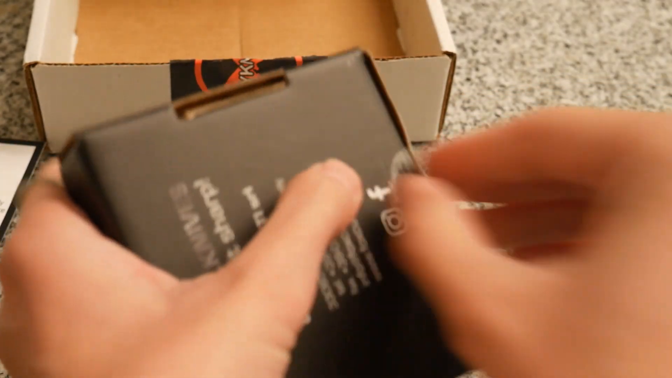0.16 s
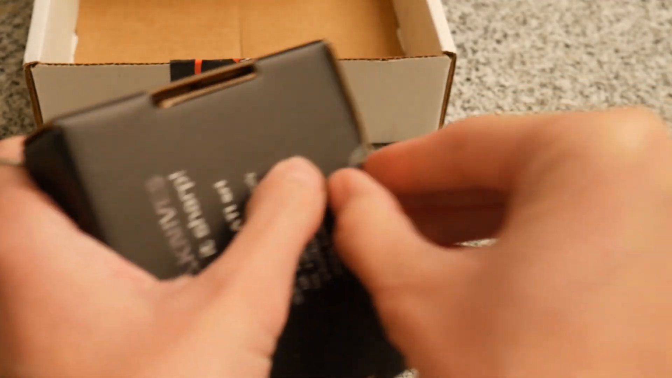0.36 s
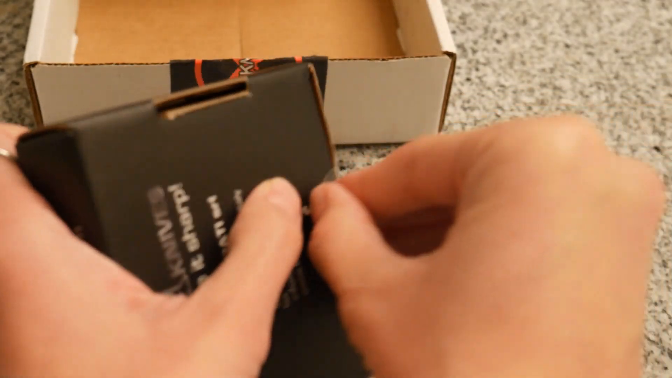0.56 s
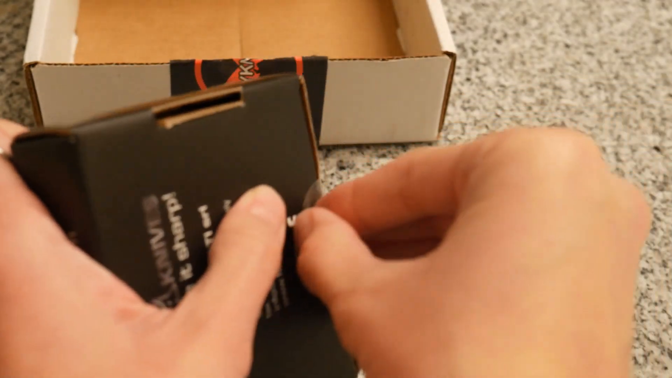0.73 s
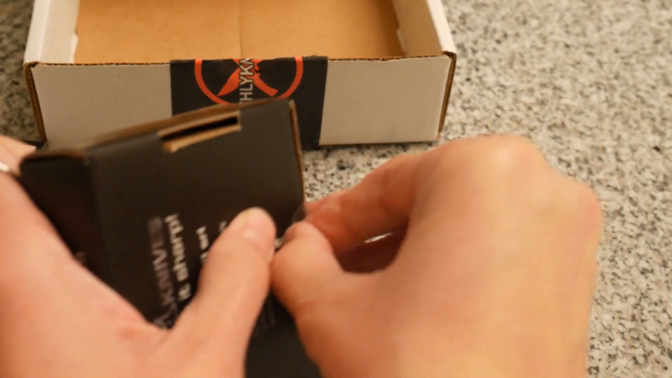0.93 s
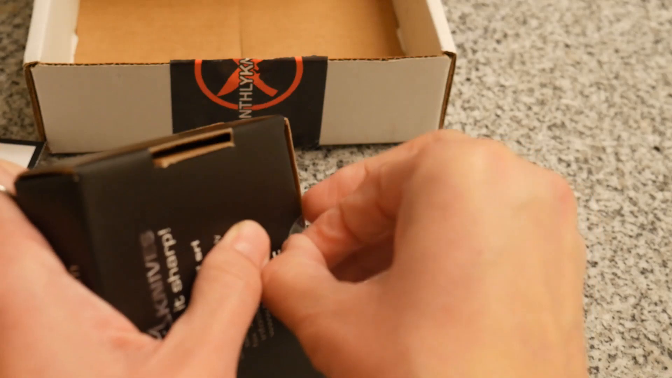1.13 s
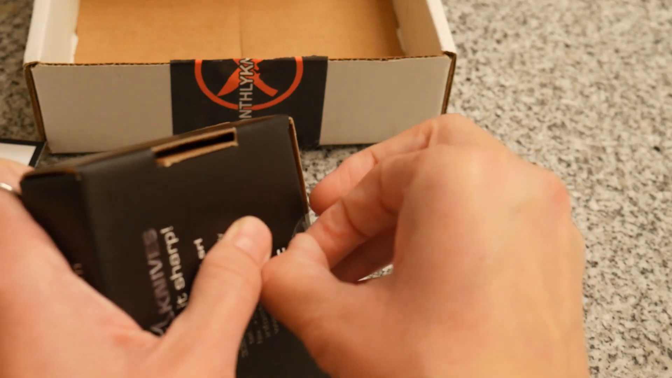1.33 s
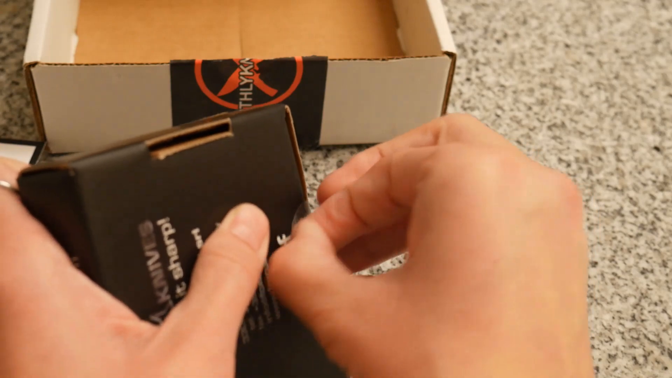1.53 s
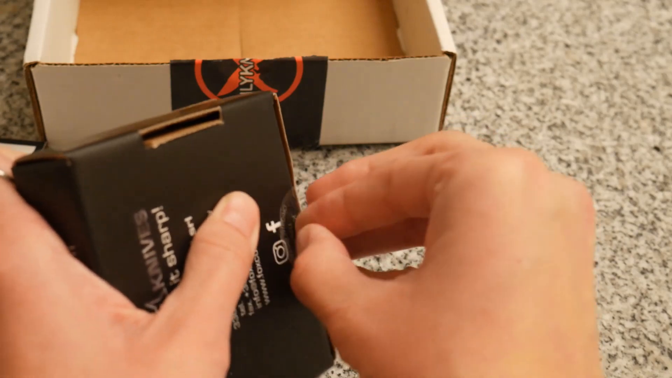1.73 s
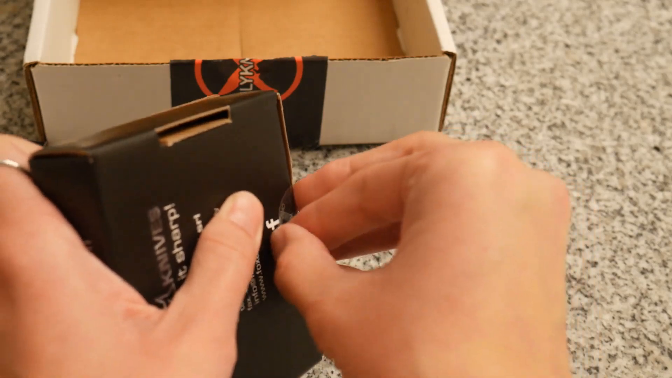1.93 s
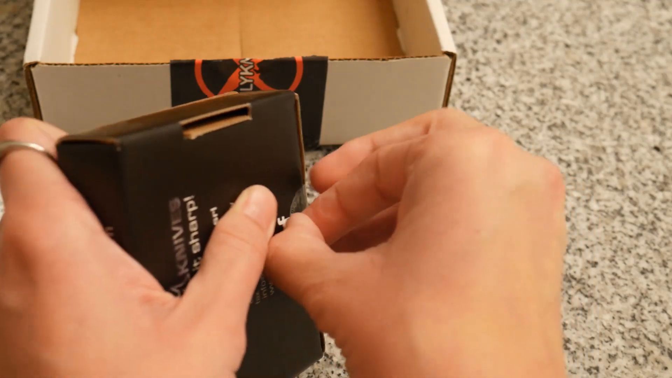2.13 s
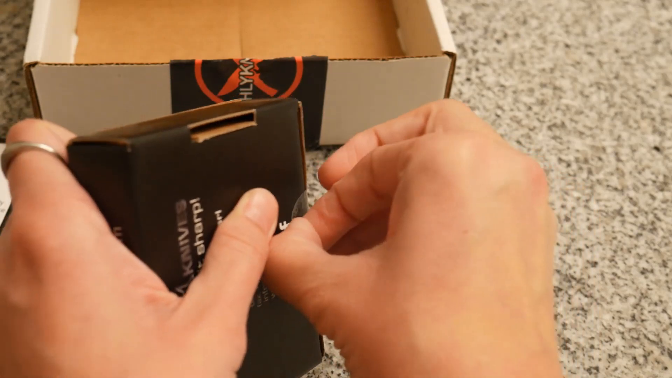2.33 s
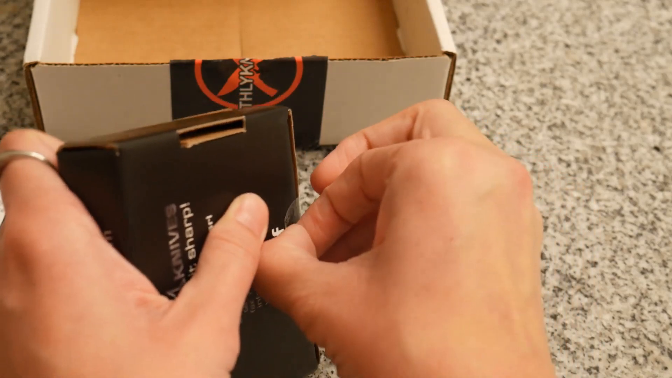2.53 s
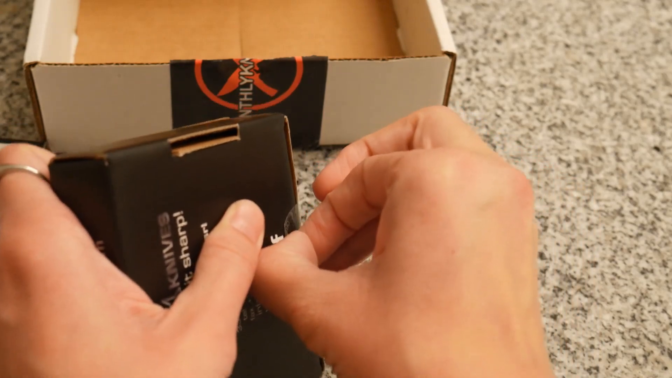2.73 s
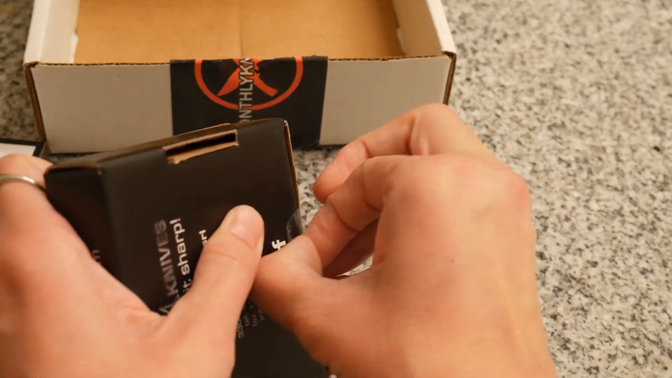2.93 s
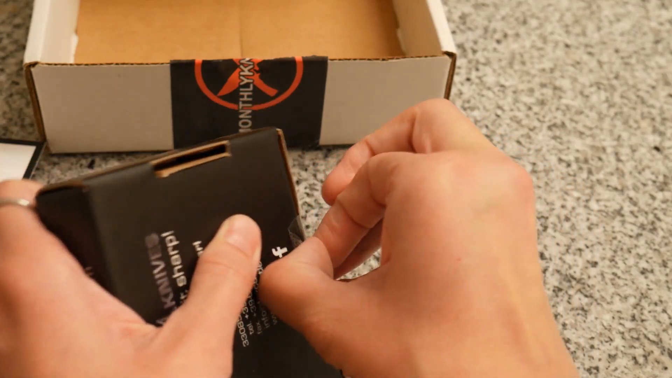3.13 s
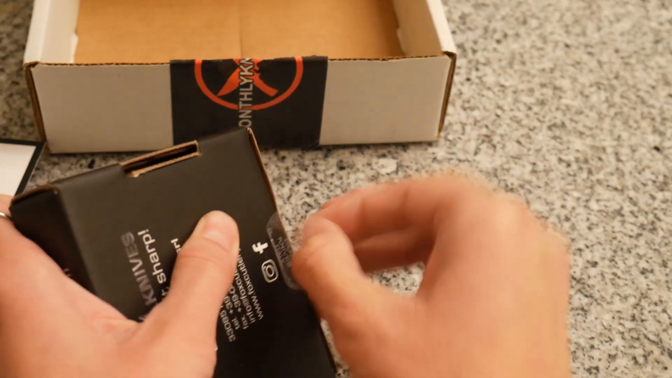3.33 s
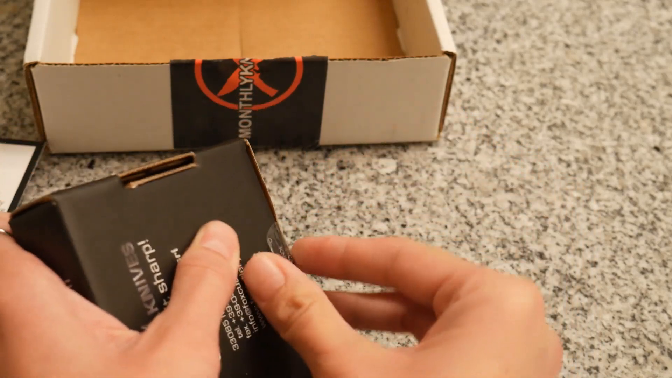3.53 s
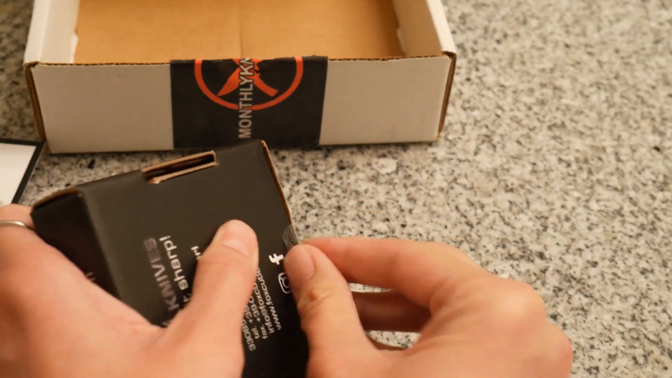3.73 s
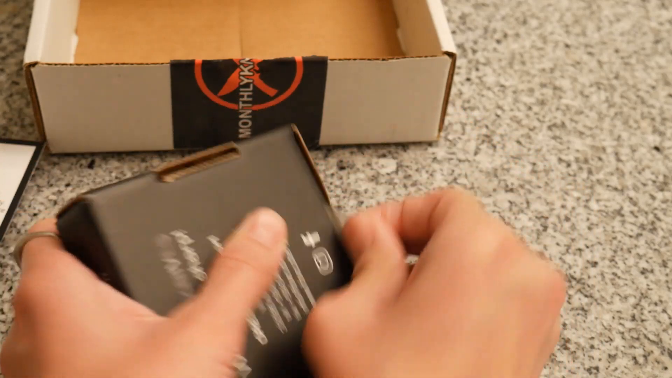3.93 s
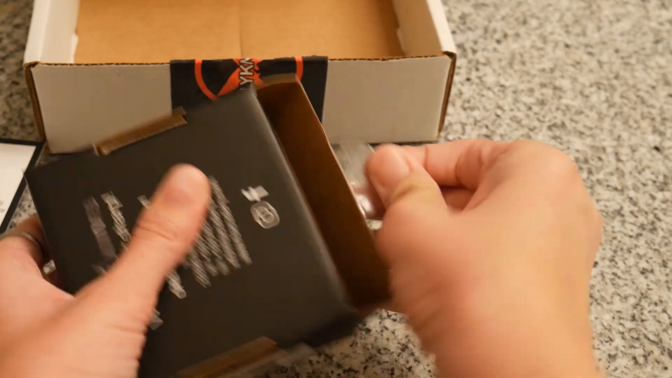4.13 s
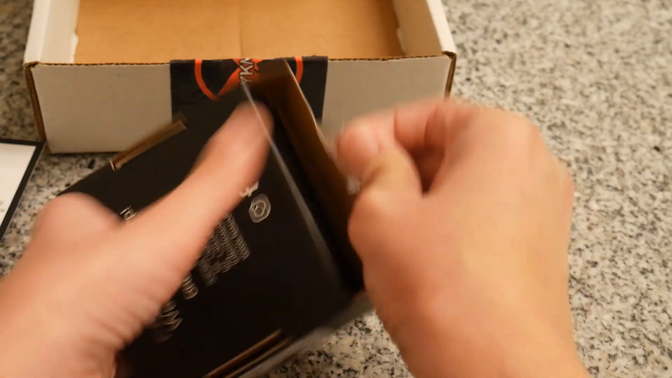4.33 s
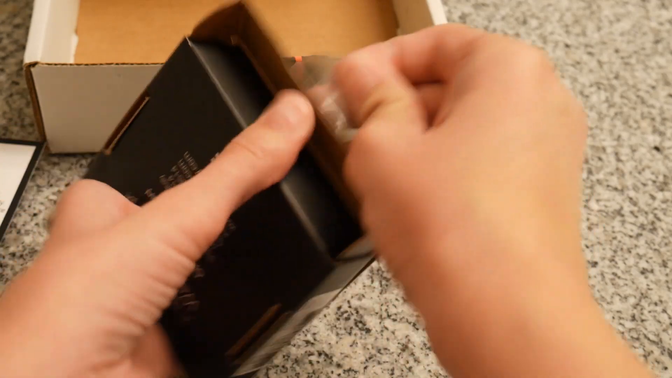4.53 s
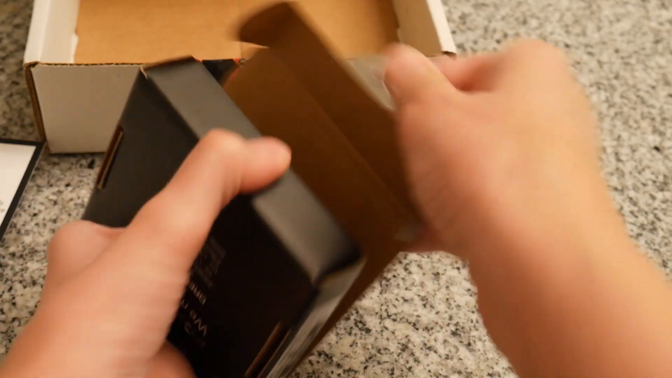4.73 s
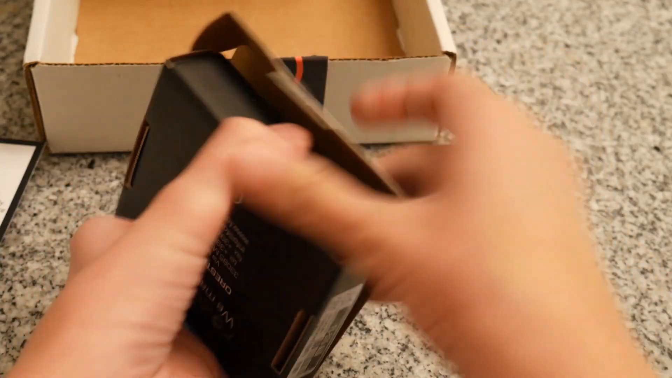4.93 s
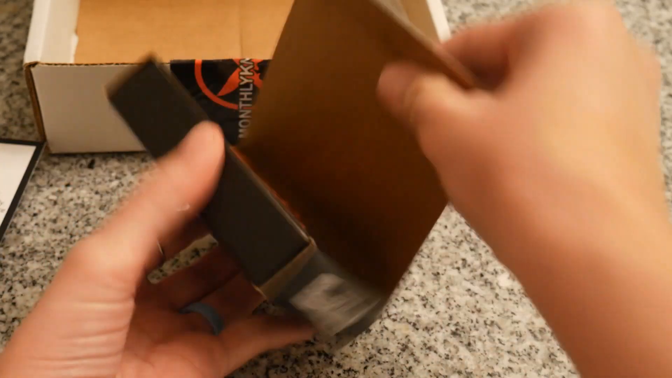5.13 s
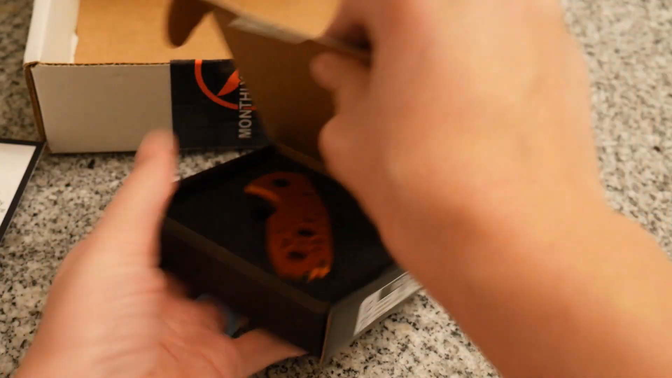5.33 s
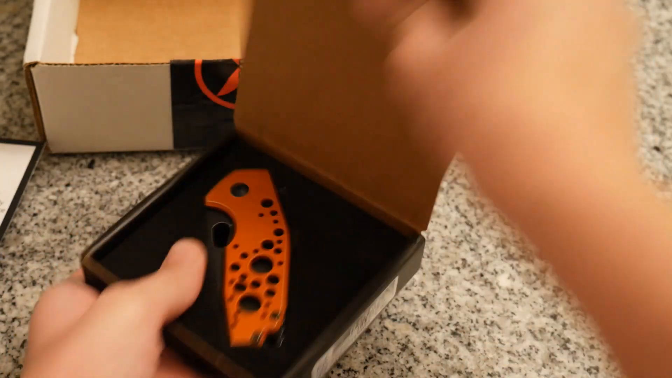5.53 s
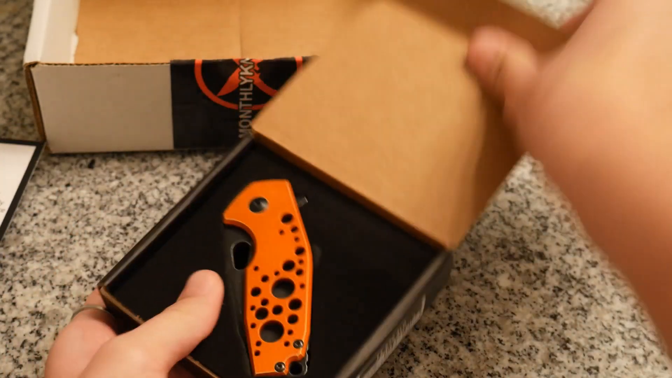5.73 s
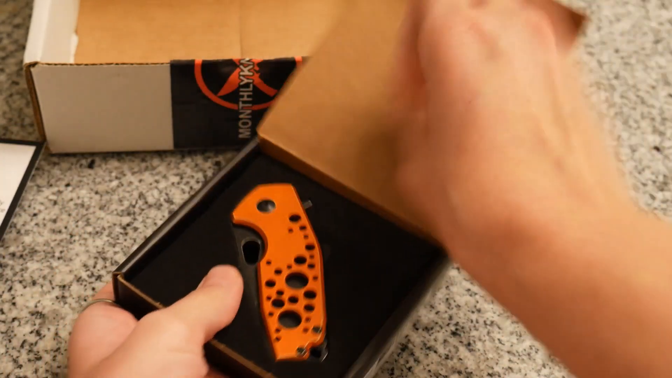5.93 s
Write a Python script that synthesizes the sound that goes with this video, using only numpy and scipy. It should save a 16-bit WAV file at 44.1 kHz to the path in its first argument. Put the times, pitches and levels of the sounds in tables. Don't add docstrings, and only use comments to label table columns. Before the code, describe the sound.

Close, dry unboxing: soft rubs and tiny nail clicks, near silence, then bright peeling snaps, hollow card knocks and rasping drags.

```python
import sys
import numpy as np
from scipy import signal
from scipy.fft import rfft, irfft
from scipy.io import wavfile

SR = 44100
rng = np.random.default_rng(int(sys.argv[2]) if len(sys.argv) > 2 else 0)


def undo_db(level):
    steps = np.asarray(level, float) / 20
    return 10 ** steps


def master(y):
    cut = np.clip(np.atleast_2d(y).T, -1, 1)
    pcm = np.round(cut * 32767)
    wavfile.write(sys.argv[1], SR, pcm.astype(np.int16))


N = 267564

# (shut until [s], open from [s])
LID_OPENS = (3.97, 4.304)
# (time [s], peak [dB], pitch [Hz], brightness [dB])
PICKS = [(0.145, -52, 5040, -18), (0.7182, -56, 2930, -37), (0.826, -54, 2500, -30),
         (0.846, -60, 2900, -20), (1.5065, -34, 7500, -8.5), (1.5268, -24, 7500, -4.5),
         (1.5479, -17, 3400, -17), (1.6932, -53, 3020, -32), (1.7943, -42, 3117, -39),
         (1.8065, -40.5, 2800, -34), (2.0008, -30.5, 6050, -11.5), (2.0496, -53, 2910, -29),
         (2.2042, -56, 3830, -6.5), (2.2107, -44.5, 6470, 2), (3.202, -46, 3425, -38),
         (3.2035, -18, 4460, -31), (3.482, -43, 3950, -11.5)]
# (time [s], peak [dB], pitch [Hz], brightness [dB])
PEELS = [(3.9326, -34.5, 4230, 3), (3.941, -14, 3900, -6), (3.9968, -2, 4400, -10),
         (4.2106, -21.5, 4220, -34), (4.231, -9.5, 3600, -10), (4.352, -15.5, 5770, -8),
         (4.3764, -16, 5330, -7), (4.3853, -9.5, 6530, -24), (4.427, -25.5, 7300, -15),
         (4.483, -38, 3180, -20), (4.5297, -38, 4970, -27), (4.6526, -33.5, 4770, -19.5),
         (4.688, -5, 5300, -13.5), (4.697, -17.5, 4870, 12), (4.7314, -21.5, 5000, -13),
         (4.743, -21, 2840, -34), (4.84, -37, 4530, -14), (4.9645, -29, 2950, -8),
         (5.1808, -30.5, 2630, -32), (5.7484, -45, 4630, -3), (5.7607, -37, 3900, -18),
         (5.8894, -19.5, 2850, -15)]


def rms_one(x):
    return x / np.sqrt(np.mean(x ** 2) + 1e-20)


def at_hz(points, hz):
    curve_hz, value = np.array(points).T[:2]
    return np.interp(np.log(hz), np.log(curve_hz), value)


def coloured(white, spectrum):
    hz = np.maximum(np.fft.rfftfreq(len(white), 1 / SR), 1)
    return rms_one(irfft(rfft(white) * undo_db(at_hz(spectrum, hz)), len(white)))


def ring(clicks, hz, t60):
    r = undo_db(-60 / (t60 * SR))
    w = 2 * np.pi * hz / SR
    return signal.lfilter([0, np.sin(w)], [1, -2 * r * np.cos(w), r * r], clicks + 1e-18)


def flicker(rate_hz, depth_db):
    step = 16
    r = np.exp(-2 * np.pi * step * rate_hz / SR)
    slow = rms_one(signal.lfilter([1], [1, -2 * r, r * r], rng.standard_normal(N // step + 1)))
    return np.repeat(undo_db(depth_db * slow), step)[:N]


def grit(per_s, spread_db):
    out = np.zeros(N)
    slips = rng.random(N) < per_s / SR
    size = rng.laplace(0, 1, slips.sum())
    out[slips] = np.sign(size) * undo_db(spread_db * np.minimum(np.abs(size), 4))
    return rms_one(out)


def strokes(rows, loss_db=0):
    peak, level_db, rise, fall = np.transpose(rows)[:4, :, None]
    step = 32
    late = np.arange(0, N + step, step) / SR - peak
    away = np.maximum(late / np.clip(fall, .004, .7), -late / np.clip(rise, .004, .7))
    swell_db = level_db - loss_db - 20 * away ** 1.205
    total_db = 10 * np.log10(np.sum(undo_db(2 * swell_db), axis=0) + 1e-14)
    return np.interp(np.arange(N) / step, np.arange(len(total_db)), total_db) - 4.5


def room_tone():
    # (frequency [Hz], density [dB per Hz])
    air_mid = [(12, -27), (20, -15), (91, -9.5), (108, -6.5), (250, -2.5), (414, -9.5), (477, -11.5),
               (564, -11), (1890, -15.5), (2290, -14.5), (2790, -15.5), (12500, -24), (15000, -25),
               (15400, -25), (15700, -50)]
    # (frequency [Hz], density [dB per Hz])
    air_side = [(12, -54), (20, -8), (200, 7), (243, 7), (313, 7), (438, 4.5), (504, 4.5), (580, 4),
                (5960, -18.5), (14600, -21.5), (15400, -25), (15700, -50)]
    mid = undo_db(-67.5) * coloured(rng.standard_normal(N), air_mid)
    hum = ring(rng.standard_normal(N), hz=120, t60=0.66)
    mid += undo_db(-78.5) * rms_one(hum)
    side = undo_db(-61.5) * coloured(rng.standard_normal(N), air_side)
    return np.array([mid + side, mid - side])


def room():
    # (frequency [Hz], t60 [s])
    room_t60 = [(150, 0.25), (530, 0.36), (1400, 0.22), (3700, 0.23), (9700, 0.26), (16000, 0.12)]
    # (delay [s], level [dB])
    echoes = [
        (.0030, -14.5),
        (.0094, -14),
        (.0118, -23),
        (.0160, -23.5),
        (.0200, -17.5),
        (.0290, -23),
    ]
    tail_db, tail_side_db = -30.5, -5.5
    size = int(.5 * SR)
    age = np.arange(size) / SR
    white = rng.standard_normal((2, 2, size))
    tail = 0
    edges = 80 * 2. ** np.arange(9)
    for k, (low, high) in enumerate(zip(edges, np.minimum(edges[1:], 20000))):
        octave = signal.butter(2, [low, high], "band", fs=SR, output="sos")
        band = signal.sosfilt(octave, white[k % 2])
        tail = tail + band * undo_db(-60 * age / at_hz(room_t60, np.sqrt(low * high)))
    mid, side = tail * undo_db(tail_db) * (1 - np.exp(-age / 0.0027))
    for k, (lag, level_db) in enumerate(echoes):
        mid[int(lag * SR)] += undo_db(level_db)
        side[int(lag * SR) + 3] += undo_db(level_db) * (-1) ** k
    side = signal.lfilter(*signal.butter(1, 400, "high", fs=SR), side)
    side = undo_db(tail_side_db) * side
    return np.array([mid + side, mid - side])


def rub_db(place):
    # (peak time [s], level [dB], rise [s], 20 dB fall [s], place [1 face, 2 edge, 3 skin alone])
    slides = [(0.0, -52.5, 0.026, 0.041, 1.4), (0.052, -54, 0.18, 0.051, 1.82),
              (0.148, -51.5, 0.015, .09, 1.9), (0.31, -60.5, 0.12, 0.03, 2),
              (0.432, -42, 0.052, 0.094, 1.34), (0.49, -43.5, 0.11, 0.027, 1.57),
              (0.606, -59.5, 0.27, 0.06, 1.84), (0.674, -54.5, 0.035, 0.026, 1.34),
              (0.76, -53.5, 0.11, 0.032, 1.8), (0.84, -50.5, 0.095, 0.19, 1.58),
              (1.0, -59.5, 0.17, 0.53, 1.75), (1.164, -50, 0.031, 0.014, 1.94),
              (1.49, -58, 0.062, 0.64, 0.76), (1.66, -66, 0.29, 0.066, 2), (1.93, -46.5, 0.065, 0.17, 1.46),
              (2.03, -50.5, .12, 0.091, 1.87), (2.9, -59, 0.079, 0.23, 1.65), (3.0, -53, 0.16, 0.12, 2),
              (3.35, -52.5, 0.083, 0.018, 2.04), (3.475, -53.5, 0.14, 0.15, 0.61),
              (3.63, -46.5, 0.11, 0.053, 2), (3.67, -53, 0.019, 0.06, 0.92),
              (3.825, -42, 0.03, 0.099, 2.17), (3.885, -42, 0.053, 0.051, 2.06)]
    # (peak time [s], level [dB], rise [s], 20 dB fall [s], place [1 face, 2 edge, 3 skin alone])
    drags = [(4.12, -37, 1, 0.081, 1.52), (4.172, -43.5, 0.19, 0.083, 3.66), (4.46, -43.5, 0.22, 0.14, 1.4),
             (4.495, -32.5, 0.022, 0.025, 2.6), (4.66, -48, 0.14, 0.14, 1.7),
             (4.72, -33, 0.086, 0.035, 3.4), (4.742, -25, 0.027, 0.055, 2.03), (4.87, -41, 0.07, 0.2, 2),
             (4.95, -42.5, 0.074, 0.09, 2.9), (5.05, -42.5, 0.22, 0.21, 2.9),
             (5.06, -50.5, 0.044, 0.062, 1.4), (5.24, -42.5, 0.21, 0.089, 1.87),
             (5.37, -50.5, 0.15, 0.32, 2.06), (5.476, -45, 0.054, 0.046, 2.13),
             (5.56, -53.5, 0.1, 0.082, 1.1), (5.63, -41.5, 0.16, 0.073, 3.57),
             (5.757, -42, 0.023, 0.044, 0.5), (5.757, -40.5, 0.016, 0.033, 3.1),
             (5.82, -34.5, 0.044, 0.09, 1.3), (5.86, -31.5, .06, 0.046, 1.2),
             (5.888, -24, 0.029, 0.027, 1.23), (5.895, -33.5, 0.094, 0.05, 3),
             (5.95, -41.5, 0.067, 0.14, 2.3), (6.04, -41, 0.06, .05, 2.17),
             (6.062, -27, 0.013, 0.025, 2.03)]
    rubs = slides + drags
    stroke_place = np.array(rubs)[:, 4:]
    return strokes(rubs, 6.5 * (stroke_place - place) ** 2)


def skin():
    # (frequency [Hz], density [dB per Hz])
    skin_hiss = [(2060, -9.5), (3500, -7), (3710, -4), (6820, -2), (7950, -5), (9680, -3.5), (14900, -17),
                 (15600, -26), (16000, -75)]
    return undo_db(rub_db(3)) * flicker(46, 1.77) * coloured(grit(7000, 3.6), skin_hiss)


def rasps(rows, cycles):
    fibres = grit(4000, 2.6)
    out = np.zeros(N)
    for row in rows:
        peak_s, hz = row[0], row[4]
        near = slice(max(int((peak_s - .4) * SR), 0), int((peak_s + .4) * SR))
        above = signal.butter(2, hz / 2, "high", fs=SR, output="sos")
        rung = ring(fibres[near] * undo_db(strokes([row])[near]), hz, cycles / hz)
        out[near] += signal.sosfilt(above, rung) * np.sqrt(hz)
    return out / np.sqrt(cycles * SR / (4 * np.log(1000)))


def pinched_face():
    # (peak time [s], level [dB], rise [s], 20 dB fall [s], pitch [Hz])
    face_rasps = [(0.445, -50, 0.097, 0.1, 870), (0.495, -55, 0.041, .025, 880),
                  (0.73, -51, 0.011, -0.16, 990), (1.697, -53.5, 0.01, 0.04, 1540),
                  (1.82, -54.5, .02, 0.05, 1650), (3.23, -49.5, 0.017, 0.05, 940),
                  (3.466, -51, 0.026, 0.1, 910), (3.486, -37, 0.0061, -0.08, 880), (3.53, -54, .04, 0, 885),
                  (3.61, -60, .05, -0.1, 940), (3.672, -40, .012, 0.07, 1570),
                  (4.749, -25, 0.012, 0.02, 1370), (4.87, -45, .04, -0.16, 1200),
                  (4.95, -43, .06, -0.1, 1320), (5.26, -51.5, 0.037, 0.27, 1810),
                  (5.82, -37, 0.034, 0.13, 1500), (5.84, -41.5, 0.082, 0.03, 690),
                  (5.95, -45.5, 0.045, -0.2, 980), (5.888, -26, .035, -0.02, 1400),
                  (5.89, -31, 0.017, -0.1, 950), (6.062, -27, 0.043, .1, 1446)]
    return rasps(face_rasps, cycles=31)


def sticker_film():
    # (peak time [s], level [dB], rise [s], 20 dB fall [s], pitch [Hz])
    rustles = [(0.85, -56, .04, 0, 2700), (0.95, -60, 0.089, -0.1, 3870), (1.07, -59.5, .06, .06, 4900),
               (1.165, -48, 0.023, -0.14, 5370), (1.565, -40, .015, .07, 4000),
               (1.59, -48, 0.05, 0.05, 7000), (0.163, -54, .02, .012, 2200), (3.62, -55.5, .06, 0.2, 3150),
               (3.71, -50, 0.086, .04, 2310), (3.83, -48, .03, .08, 3000), (3.89, -46, .06, .03, 2250),
               (5.19, -35, .008, .06, 2500), (4.245, -31, .02, .07, 3800), (4.22, -38, .01, .03, 4200),
               (4.4, -39, 0.025, 0.12, 2960), (4.705, -38, .01, -0.08, 5300)]
    return rasps(rustles, cycles=8)


def blows():
    # (time [s], hollow level [dB], panel level [dB])
    taps = [(0.1302, -58, -51), (0.1468, -60, -60), (0.2595, -53.5, -47), (0.2851, -49, -50.5),
            (0.556, -54, -60), (0.7179, -43, -47), (0.827, -52, -57), (1.428, -59, -53),
            (1.5476, -58, -41.5), (1.6934, -77, -43.5), (1.7948, -55, -49), (1.807, -76, -39),
            (1.8472, -50.5, -50), (2.0007, -62, -40.5), (2.0485, -55, -44), (2.203, -65, -47.5),
            (2.2106, -56, -44), (3.1982, -44, -32), (3.2032, -44, -26), (3.4814, -49.5, -39.5),
            (3.5024, -72, -60)]
    # (time [s], hollow level [dB], panel level [dB])
    knocks = [(3.9329, -57, -53), (3.94, -56, -31.5), (3.9966, -33, -21), (4.1905, -39.5, -68),
              (4.2118, -48, -48), (4.232, -45, -29), (4.317, -31.5, -41), (4.3525, -41, -50),
              (4.3857, -57, -33), (4.4245, -33, -31), (4.4829, -55, -42), (4.5299, -38.5, -43),
              (4.6523, -43, -44.5), (4.733, -33.5, -24.5), (4.8406, -46, -38), (4.9653, -52, -40),
              (5.147, -40.5, -42), (5.1813, -30, -22), (5.354, -43, -67), (5.4, -52, -45),
              (5.4768, -73, -44.5), (5.747, -62, -39), (5.7601, -55, -32.5), (5.8872, -47, -27)]
    jolts = [(s, db - 60, db - 31) for s, db, _, _ in PICKS + PEELS]
    return np.transpose(jolts + taps + knocks)


def body(modes, rub_level_db, knock_db, per_s, rough_db, ring_share):
    at = (blows()[0] * SR).astype(int)
    strength = rng.normal(0, 1, (len(at), len(modes)))
    rubbed, struck = np.zeros(N), np.zeros(N)
    ragged = rng.standard_normal(N)
    for k, (hz, shut_db, open_db, t60) in enumerate(modes):
        level_db = np.interp(np.arange(N) / SR, LID_OPENS, [shut_db, open_db])
        friction = grit(per_s, 0.78) * undo_db(rub_level_db + level_db) * flicker(21.0, rough_db)
        rubbed += ring(friction, hz, t60)
        clicks = np.zeros(N)
        np.add.at(clicks, at, undo_db(knock_db + level_db[at] + 0.89 * strength[:, k]))
        yielding = signal.lfilter([1], [1, -np.exp(-1 / (0.0045 * SR))], clicks + 1e-18)
        crush = 0.078 * ragged * yielding
        struck += ring(0.37 * clicks + crush, hz, ring_share * t60)
    weight = np.sqrt(sum(undo_db(2 * db) * t60 * SR / 28 for hz, _, db, t60 in modes))
    span = [1.14 * modes[0][0], 1.36 * modes[-1][0]]
    reach = signal.butter(3, span, "band", fs=SR, output="sos")
    return signal.sosfilt(reach, rubbed / weight + struck)


def hollow():
    # (frequency [Hz], shut level [dB], open level [dB], t60 [s])
    hollow_modes = [(125, -26, -15, 0.2), (194, -3, -9, 0.0093), (294, -15, -12, 0.03), (332, -7, 4, 0.06),
                    (384, -2, 1, 0.015), (445, 2.5, 0, 0.022), (397, -3.5, -6, 0.052),
                    (560, -6, -18, 0.0038), (615, 2.5, 0.5, 0.0068)]
    # (peak time [s], level [dB], rise [s], 20 dB fall [s])
    palm = [(0.052, -57, .2, -0.3), (0.31, -61, .05, .15), (0.402, -47.5, .051, 0.15), (0.486, -60, .1, .1),
            (0.556, -55, .015, 0), (0.63, -58, .1, .3), (0.75, -56, .03, 0.5), (0.832, -50, .08, 0.25),
            (0.94, -51.5, 0.11, 0), (1.1, -63.5, .15, .3), (1.46, -55.5, .1, 0.5), (1.58, -53, .08, 0),
            (1.79, -61.5, .079, .1), (1.95, -54.5, .089, 0.4), (2.1, -57, 0.14, 0.2), (2.43, -68, .2, .5),
            (3.0, -67, .3, 0.5), (3.3, -62, .1, 1), (3.5, -60, 0.11, -0.2), (3.62, -65, .08, 3),
            (3.89, -61, 0.18, .2), (4.1, -47.5, 0.23, 0.6), (4.2, -44, .03, 0.6), (4.35, -45, 0.062, 0),
            (4.43, -42.5, .04, .06), (4.47, -44, .04, -0.1), (4.535, -45.5, 0.022, 0.2),
            (4.62, -53, .04, 1), (4.665, -51, .03, 0.7), (4.76, -54.5, .05, .12), (4.85, -53, .05, -0.7),
            (4.95, -51.5, 0.073, .05), (4.98, -52.5, .02, .12), (5.06, -52, .05, 2),
            (5.12, -50, 0.044, 0.5), (5.24, -45.5, .053, 0.05), (5.31, -51, .03, -0.1),
            (5.37, -52, 0.035, 0.2), (5.46, -42, 0.092, 0.12), (5.56, -56, .05, -0.3), (5.63, -64, .04, 1),
            (5.83, -52, 0.075, 0.3), (5.91, -48, .05, 0.1), (5.99, -55, .09, -0.2)]
    return body(hollow_modes, strokes(palm, loss_db=5.0), blows()[1] - 3,
                per_s=340, rough_db=3.0, ring_share=0.47)


def panels():
    # (frequency [Hz], shut level [dB], open level [dB], t60 [s])
    panel_modes = [(757, -3, 1, 0.016), (807, 0, -5, 0.011), (923, -6, -2.5, 0.024),
                   (1147, -12.5, 3.5, 0.016), (1393, -15, -0.5, 0.017), (1570, -19, 1.5, 0.014),
                   (1480, -6, -31, 0.016), (1710, -8, -0.5, 0.0067), (2160, -5.5, -66, 0.0084)]
    return body(panel_modes, rub_db(1), blows()[2] - 1, per_s=2000, rough_db=4.5, ring_share=0.59)


def flap_edges():
    # (frequency [Hz], shut level [dB], open level [dB], t60 [s])
    edge_modes = [(1946, 6.5, 15, 0.0043), (2360, 2, 0.5, 0.0057), (2470, -28, -10, 0.013),
                  (2840, -7.5, -8, 0.028), (3125, -4, -2, 0.0083), (3930, -18, -9, 0.027),
                  (5080, 1, 4, 0.002)]
    # (peak time [s], level [dB], rise [s], 20 dB fall [s])
    nail = [
        (1.702, -43, 0.033, -0.13),
        (1.8, -33.5, 0.019, 0.01),
        (2.58, -65, 0.063, .4),
        (2.73, -66.5, .1, .4),
        (3.448, -64, 0.055, -4),
        (3.654, -48, .08, 0.09),
        (4.512, -40, 0.027, 0.1),
        (5.474, -51.5, 0.05, 0.3),
    ]
    edge_db = 10 * np.log10(undo_db(2 * rub_db(2)) + undo_db(2 * strokes(nail)))
    time_s, _, panel_db = blows()
    knock_db = panel_db + np.interp(time_s, LID_OPENS, [-6, -8])
    return body(edge_modes, edge_db, knock_db, per_s=3000, rough_db=2.5, ring_share=0.83)


def snaps():
    size = 600
    out = np.zeros(N + size)
    age = np.arange(size) / SR
    chance = rng.standard_normal((len(PICKS + PEELS), size))
    film = signal.butter(3, [2600, 12500], "band", fs=SR, output="sos")
    dull = signal.butter(1, 8000, fs=SR)
    for (s, peak_db, hz, bright_db), noise in zip(PICKS + PEELS, chance):
        lines = rfft((age == 0) + undo_db(-15.0) * noise * np.exp(-age / 0.033))
        burst = irfft(lines / np.abs(lines)) * np.exp(-age / 0.0016)
        crack = signal.sosfilt(film, burst)
        crack = crack + 0.99 * signal.lfilter(*signal.iirpeak(hz, 2.2, fs=SR), crack)
        for _ in range(2):
            low = signal.lfilter(*dull, crack)
            crack = low + undo_db(1.35 * bright_db + 9.5) * (crack - low)
        i = int(s * SR)
        out[i:i + size] += crack * undo_db(peak_db + 5.5) / np.abs(crack).max()
    return out[:N]


def scene():
    tone, answer = room_tone(), room()
    near = skin() + pinched_face() + sticker_film()
    near = near + hollow() + panels() + flap_edges() + snaps()
    no_bass = signal.butter(2, 110, "high", fs=SR, output="sos")
    near = signal.sosfilt(no_bass, near)
    direct = near * undo_db([[-.15], [.15]])
    return direct + signal.fftconvolve(near[None], answer, axes=1)[:, :N] + tone


def roll_off(x):
    return signal.sosfilt(signal.butter(12, 16510, fs=SR, output="sos"), x)


def record(dry):
    notched = signal.lfilter(*signal.iirnotch(7880, 40., fs=SR), dry)
    rounded = notched / (1 + (notched / .9) ** 6) ** (1 / 6)
    cut = signal.sosfilt(signal.cheby2(12, 80, 16700, fs=SR, output="sos"), rounded)
    return roll_off(cut)


dry = scene()
out = record(dry)
master(out)
```